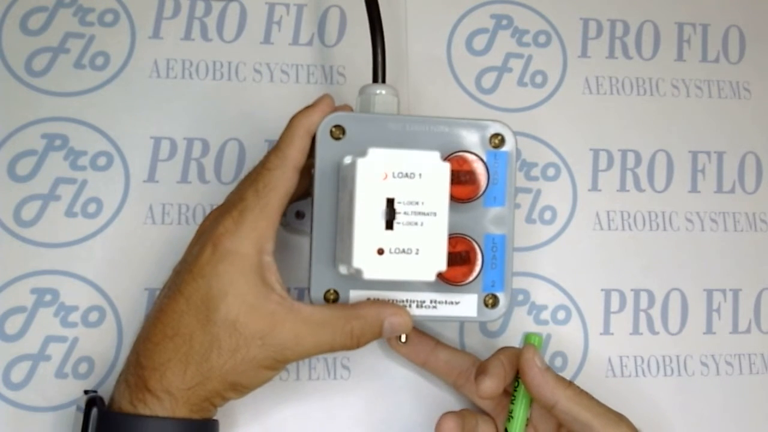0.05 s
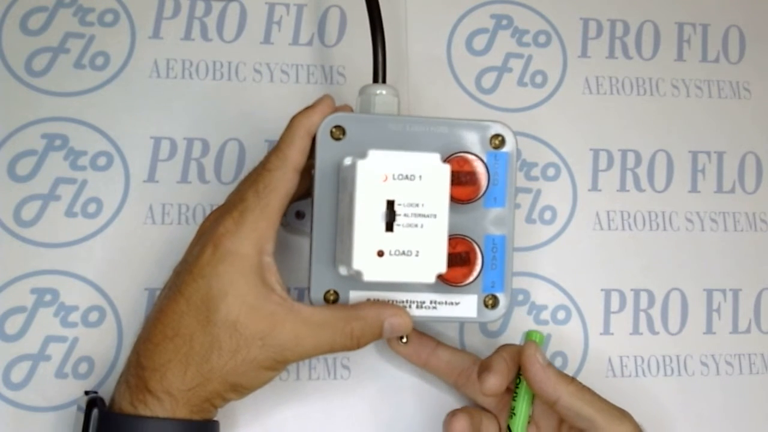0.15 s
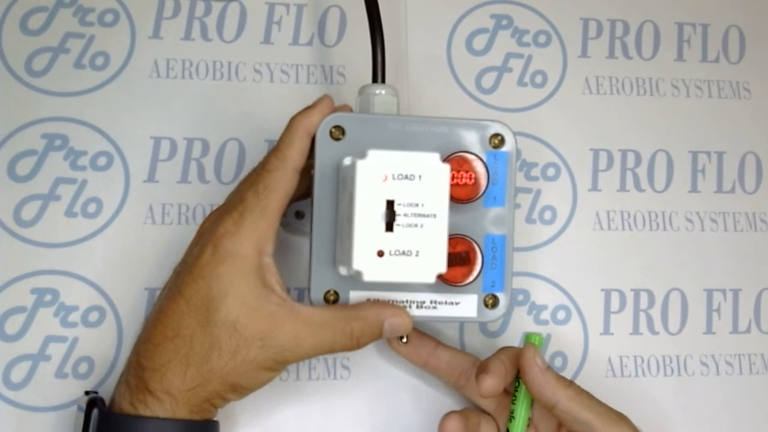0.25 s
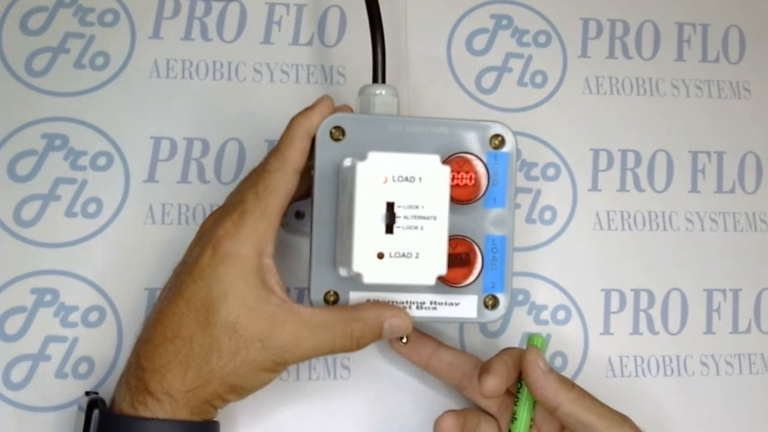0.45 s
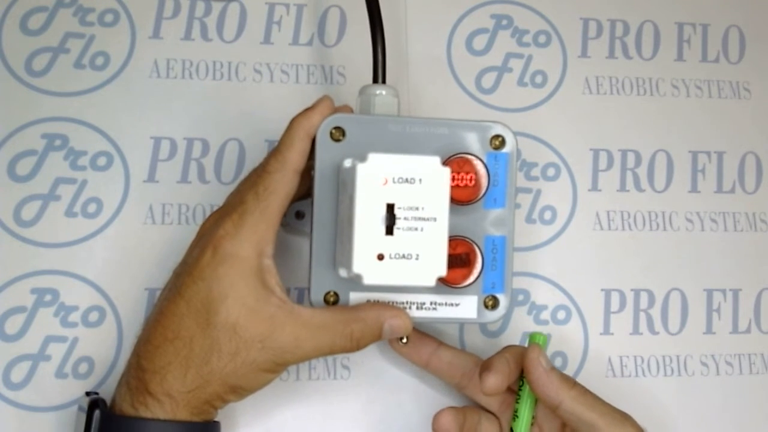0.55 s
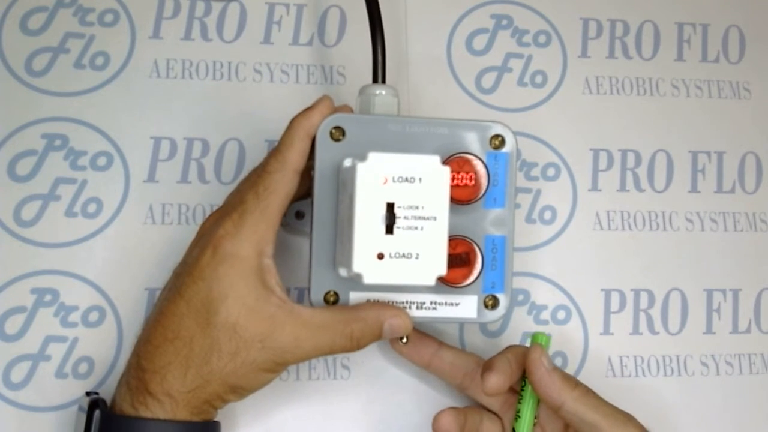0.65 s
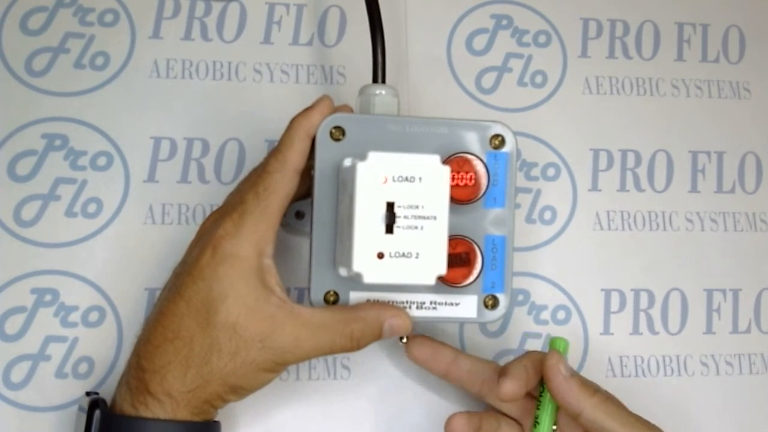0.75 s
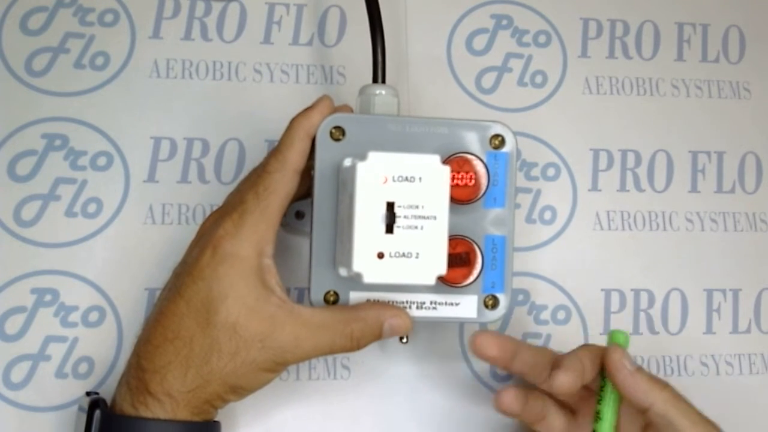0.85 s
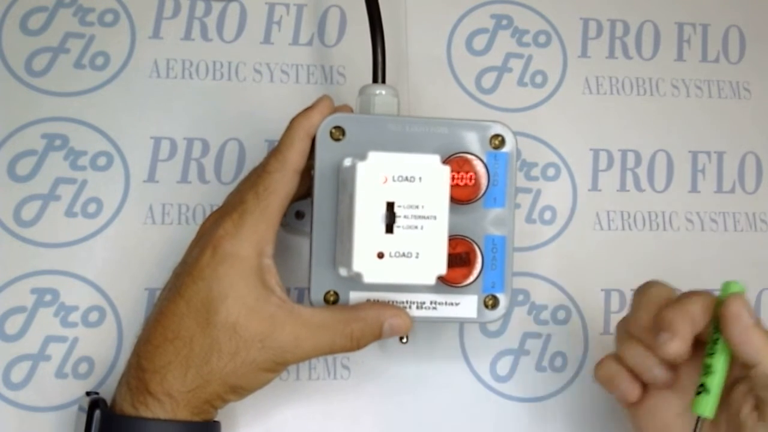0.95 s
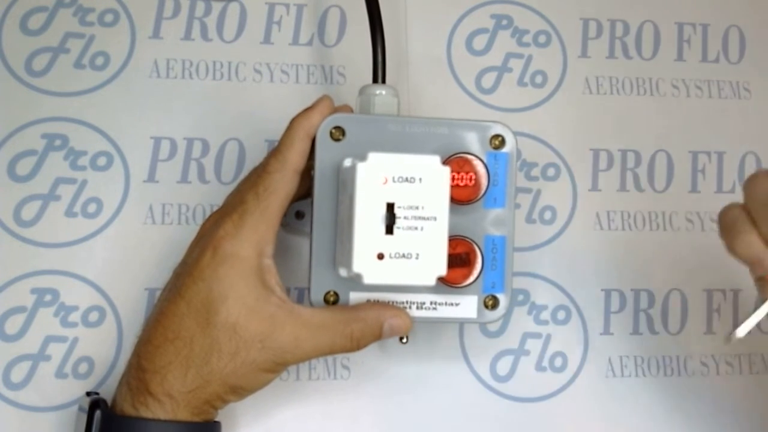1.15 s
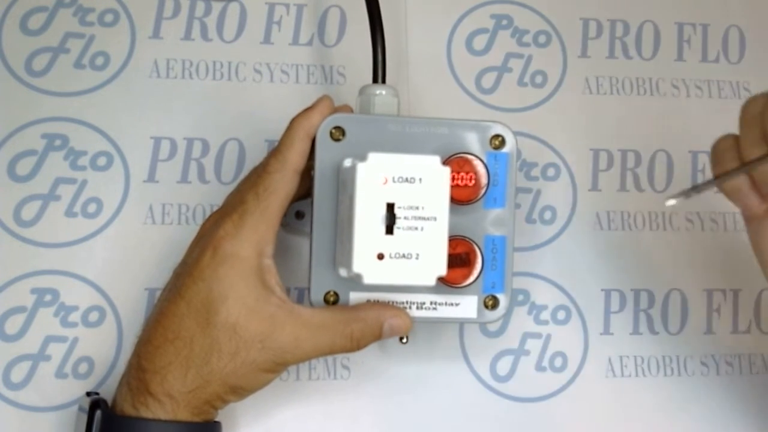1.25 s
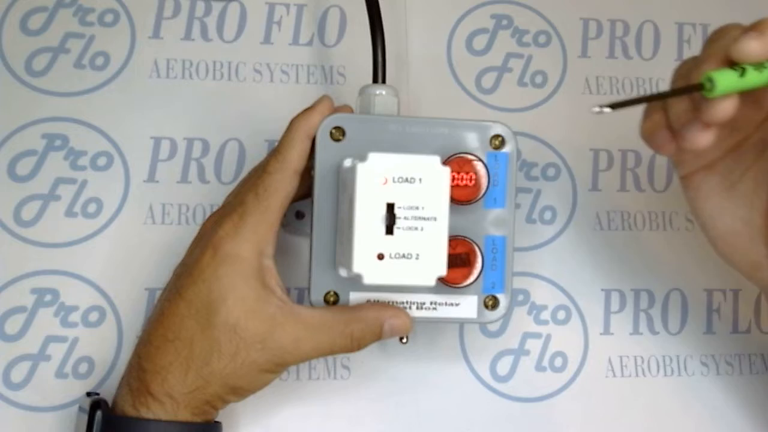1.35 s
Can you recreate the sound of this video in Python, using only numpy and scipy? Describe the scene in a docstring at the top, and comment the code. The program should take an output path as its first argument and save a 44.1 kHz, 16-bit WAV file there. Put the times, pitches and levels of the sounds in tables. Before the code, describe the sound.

In a small, bare room, a toggle switch on a plastic box gives one sharp metallic click that slightly overloads the microphone. Then fingers and a screwdriver tick lightly, over a faint electrical hum and hiss.

```python
"""A small, bare room: a metal toggle switch snaps over once on a hand-held plastic test box. The lever cracks
and rings briefly, its end stop knocks the box, and table, walls and room answer. Fingers and a screwdriver make
a few faint handling ticks. A low hum sags slightly over the room's rumble and hiss. The microphone overloads a
little on the snap."""
import sys
import numpy as np
from scipy import signal
from scipy.fft import rfft, irfft
from scipy.io import wavfile

SR = 44100
rng = np.random.default_rng(int(sys.argv[2]) if len(sys.argv) > 2 else 0)


def materialize(psi):
    """Save the field psi as 16-bit PCM at rate SR to the path in sys.argv[1].

    A 1-D psi becomes a single channel; in a 2-D psi each row is a channel.
    """
    bounded = np.clip(np.atleast_2d(psi).T, -1, 1)
    quanta = np.round(bounded * 32767).astype(np.int16)
    wavfile.write(sys.argv[1], SR, quanta)


N = 61739
TIME_S = np.arange(N) / SR
BIN_HZ = np.arange(N // 2 + 1) * SR / N

# low hum: time_s, pitch_hz, fundamental_db, octave_db
HUM_TRACK = [(0, 96.5, -57.5, -71.5), (0.15, 101.2, -57, -74.5), (0.36, 100.6, -54.5, -70.5),
             (0.53, 98.8, -53, -60.5), (0.72, 96.2, -62, -64.5), (0.86, 94.5, -61.5, -61.5),
             (0.95, 91.27, -63, -66), (1.31, 91.5, -67, -94), (1.39, 100.7, -57, -73)]
# hiss shape: freq_hz, density_db
HISS_SPECTRUM = [(25, 14.5), (60, 8.5), (150, 6.5), (400, 3.5), (700, 2), (1200, 0.5), (3000, 0),
                 (7000, -2.5), (15500, -6.5)]
# rumble shape: freq_hz, density_db
RUMBLE_SPECTRUM = [(70, -25), (125, -2.5), (160, 1), (230, -2), (280, -12.5), (380, -14), (700, -24.5),
                   (2000, -50)]
# finger and screwdriver touches: start_s, body_db, knock_db, tick_db, ring_db, top_db, t60_s
TOUCHES = [(0.101, -62, -77, -59.5, -62.5, -92, 0.04), (0.107, -56, -64, -56.5, -64.5, -85, .025),
           (0.984, -74.5, -78, -83, -62, -83.5, 0.0085), (1.021, -75, -59.5, -65.5, -80, -78, 0.011),
           (1.102, -72, -65, -60.5, -55, -58.5, 0.015), (1.1862, -73, -62.5, -55.5, -47, -53, 0.018),
           (1.2055, -80, -76, -65.5, -51, -54.5, 0.013), (1.317, -82, -77, -70, -55, -65.5, 0.012),
           (1.331, -72, -57.5, -63, -54, -61.5, 0.0089), (1.3636, -59, -62, -58, -54.5, -69, 0.024),
           (1.3776, -58, -53.5, -59, -52.5, -74, 0.013)]
# touch bands (body, knock, tick, ring, top): low_hz, high_hz
TOUCH_BANDS = [(760, 1100), (1250, 2900), (3600, 5700), (5900, 7500), (8500, 12310)]
# snap contacts, release to end stop: start_s, gain_db
SNAP_CONTACTS = [(0.2376, -17), (0.2380, -2), (0.2386, -5), (0.2393, -1)]
# lever and spring modes: freq_hz, gain_db, t60_s
LEVER_MODES = [(6370, -8, .03), (6780, -4.5, .018), (6910, -7, .01), (7450, -6.5, .01), (8530, -19, .015),
               (10140, -13.5, 0.016), (10970, -21.5, 0.016)]
# clear modes of the plastic box: freq_hz, gain_db, t60_s
BOX_MODES = [(203.5, -4.5, 0.14), (318.8, -16, .07), (560, -15.5, .025), (1050, -2.5, 0.027),
             (1710, -4.5, 0.044), (2783, 0, .02), (3840, 1.5, 0.016), (4200, 4.5, .022), (5330, -5, .02)]
# dense, well damped modes of the box: freq_hz, density_db
CLATTER_SPECTRUM = [(100, -29), (300, -8), (600, 0.5), (1000, -4), (1400, -4.5), (2000, -2), (3000, 2),
                    (4100, 3.5), (5600, -2.5), (8000, -9), (10500, -18), (12500, -13.5), (16000, -46.5)]
# table and wall reflections: delay_s, gain_db
REFLECTIONS = [(.0036, -12), (.0062, -21.5), (0.0136, -9.5), (.0160, -13), (.0385, -15)]
# room tail colour: freq_hz, gain_db
ROOM_COLOUR = [(70, -22.5), (120, -6), (165, 5), (210, 10.5), (260, 0), (320, 5), (550, -3.5), (800, -1.5),
               (1080, 3.5), (1350, -7), (1700, 1), (2000, -3.5), (2800, -1.5), (4000, 0.5), (5600, -0.5),
               (6650, 3.5), (8000, -6.5), (10300, -14), (12500, -28), (15000, -41.5)]
# room tail decay: freq_hz, t60_s
ROOM_DECAY = [(150, 0.16), (400, .3), (1000, .24), (3000, .23), (7000, .23), (14000, .2)]

END_STOP_S = 0.2393


def from_db(db):
    """Decibels to gain."""
    return 10 ** (np.asarray(db) / 20)


def unit_rms(x):
    """Scale to rms 1."""
    return x / np.sqrt(np.mean(x ** 2) + 1e-20)


def at_hz(table, hz):
    """Read a table on a log-frequency axis."""
    freq_hz, value = np.transpose(table)
    return np.interp(np.log(hz + 1e-9), np.log(freq_hz), value)


def coloured_noise(spectrum):
    """Noise with the given spectrum, rms 1."""
    return unit_rms(irfft(rfft(rng.standard_normal(N)) * from_db(at_hz(spectrum, BIN_HZ)), N))


def band_noise(low_hz, high_hz):
    """Band-passed noise, rms 1."""
    sos = signal.butter(3, [low_hz, high_hz], "band", fs=SR, output="sos")
    return unit_rms(signal.sosfilt(sos, rng.standard_normal(2 * N))[N:])


def waver(low_hz, high_hz):
    """Slow random swing between two rates, rms 1."""
    return unit_rms(irfft(rfft(rng.standard_normal(N)) * (BIN_HZ > low_hz) * (BIN_HZ < high_hz), N))


def decay(start_s, t60_s):
    """Sudden start, exponential decay."""
    return (TIME_S >= start_s) * from_db(-60 * np.maximum(TIME_S - start_s, 0) / t60_s)


def ring(start_s, freq_hz, t60_s):
    """One struck mode."""
    return decay(start_s, t60_s) * np.sin(2 * np.pi * freq_hz * (TIME_S - start_s))


def hum(waver_db=2.5, whine_hz=540, whine_db=-84):
    """A low tone and its octave waver, sag and recover beside a faint steady whine."""
    time_s, *columns = np.transpose(HUM_TRACK)
    pitch_hz, fundamental_db, octave_db = [np.interp(TIME_S, time_s, c) for c in columns]
    phase = 2 * np.pi * (np.cumsum(pitch_hz) / SR + rng.random())
    fundamental = from_db(fundamental_db + waver_db * waver(low_hz=2.9, high_hz=11)) * np.sin(phase)
    octave = from_db(octave_db) * np.sin(2 * phase)
    whine = from_db(whine_db) * np.sin(2 * np.pi * whine_hz * TIME_S)
    return np.sqrt(2) * (fundamental + octave + whine)   # rms to peak


def air(hiss_db=-69, rumble_db=-61.5, follow_share=0.33):
    """Steady hiss, and a rumble that partly follows the hum's level."""
    time_s, _, hum_db, _ = np.transpose(HUM_TRACK)
    swing_db = follow_share * np.interp(TIME_S, time_s, hum_db - hum_db.mean())
    hiss = from_db(hiss_db) * coloured_noise(HISS_SPECTRUM)
    rumble = from_db(rumble_db + swing_db) * coloured_noise(RUMBLE_SPECTRUM)
    return hiss + rumble


def handling(tap_db=-38):
    """Light touches: short noise bursts, dull to bright. One tiny metallic tap rings."""
    out = from_db(tap_db) * ring(start_s=1.3751, freq_hz=5340, t60_s=.01)
    for k, edges_hz in enumerate(TOUCH_BANDS):
        envelope = sum(from_db(band_db[k]) * decay(start_s, t60_s)
                       for start_s, *band_db, t60_s in TOUCHES)
        out += band_noise(*edges_hz) * envelope
    return out


def lever(ring_db=-15.5, crack_db=-18.5, crack_t60_s=.0036):
    """Each contact cracks and adds to the swing of the lever's modes, which peaks at the last one."""
    ringing = np.zeros(N)
    for freq_hz, gain_db, t60_s in LEVER_MODES:
        swing = sum(from_db(gain_db + hit_db) * decay(hit_s, t60_s) for hit_s, hit_db in SNAP_CONTACTS)
        ringing += swing * np.sin(2 * np.pi * freq_hz * (TIME_S - END_STOP_S))
    bursts = sum(from_db(hit_db) * decay(hit_s, crack_t60_s) for hit_s, hit_db in SNAP_CONTACTS)
    crack = band_noise(low_hz=2000, high_hz=16000) * bursts
    return from_db(ring_db) * ringing + from_db(crack_db) * crack


def box(knock_db=-21.5, clatter_db=-16.5, build_cycles=.7):
    """The end stop knocks the box: a few clear modes in a dense, short clatter."""
    out = from_db(clatter_db) * coloured_noise(CLATTER_SPECTRUM) * decay(END_STOP_S, t60_s=.035)
    age_s = np.maximum(TIME_S - END_STOP_S, 0)
    for k, (freq_hz, gain_db, t60_s) in enumerate(BOX_MODES):
        build = 1 - np.exp(-age_s * freq_hz / build_cycles)   # a panel needs a cycle or so to swing up
        out += (-1) ** k * from_db(knock_db + gain_db) * build * ring(END_STOP_S, freq_hz, t60_s)
    return out


def echoes(x, cutoff_hz=8000):
    """Early reflections off table and walls, duller than the direct sound."""
    dull = signal.sosfilt(signal.butter(4, cutoff_hz, fs=SR, output="sos"), x)
    return sum(from_db(gain_db) * np.interp(TIME_S - delay_s, TIME_S, dull, left=0)
               for delay_s, gain_db in REFLECTIONS)


def room(x, gain_db=-1.5, onset_s=.0066, hold_s=.03, late_db=-21, late_t60_s=.52):
    """Diffuse tail: holds while reflections arrive, then dies band by band over a weak, slower decay."""
    centres_hz = np.geomspace(100, 16000, 12)
    white = rfft(rng.standard_normal(N))
    colour = from_db(at_hz(ROOM_COLOUR, BIN_HZ))
    age_s = np.maximum(TIME_S - onset_s - hold_s, 0)
    late = from_db(late_db - 60 * age_s / late_t60_s)
    response = np.zeros(N)
    for centre_hz, weights in zip(centres_hz, np.eye(len(centres_hz))):
        triangle = at_hz(np.c_[centres_hz, weights], BIN_HZ)
        band = irfft(white * triangle * colour, N)
        main = from_db(-60 * age_s / at_hz(ROOM_DECAY, centre_hz))
        response += band * (main + late)
    response *= (TIME_S > onset_s) * from_db(gain_db) / np.sqrt(hold_s * SR)
    return signal.fftconvolve(x, response)[:N]


def scene(pulse_db=11, snap_send_db=-18.5, touch_send_db=-11):
    """Switch and handling in the room, over hum and air."""
    snap = lever() + box()
    touches = handling()
    # summed over all directions, the snap reaches the walls as one broadband pulse
    pulse = from_db(pulse_db) * (np.arange(N) == int(END_STOP_S * SR))
    tail = room(pulse + from_db(snap_send_db) * snap + from_db(touch_send_db) * touches)
    return (snap + echoes(snap) + touches + tail + hum() + air())[None]


def record(dry, low_cut_hz=70, high_cut_hz=15900, overload_level=.4):
    """Microphone: sheds deep bass, overloads slightly on the snap, cuts the top."""
    thin = signal.sosfilt(signal.butter(4, low_cut_hz, "high", fs=SR, output="sos"), dry)
    rounded = thin / (1 + (thin / overload_level) ** 4) ** (1 / 4)
    return signal.sosfilt(signal.ellip(10, .1, 80, high_cut_hz, fs=SR, output="sos"), rounded)


dry = scene()
out = record(dry)
materialize(out)
```